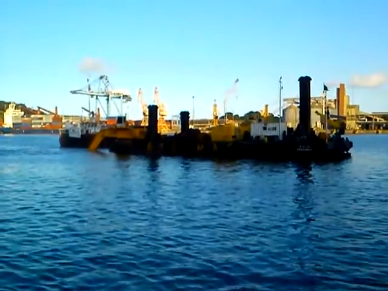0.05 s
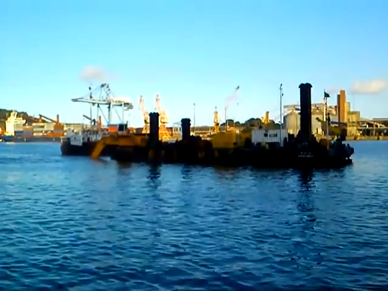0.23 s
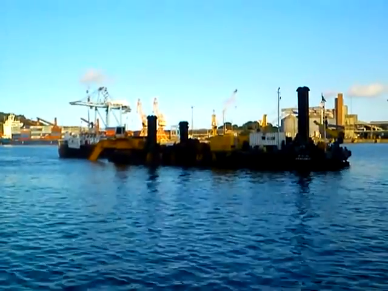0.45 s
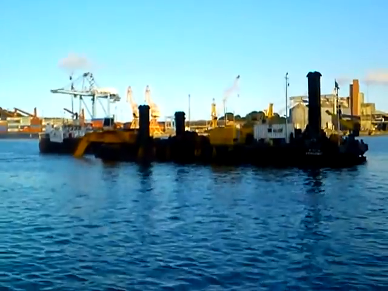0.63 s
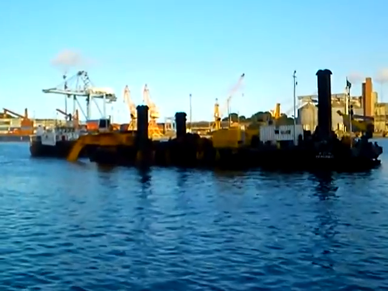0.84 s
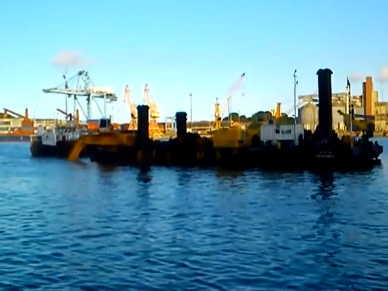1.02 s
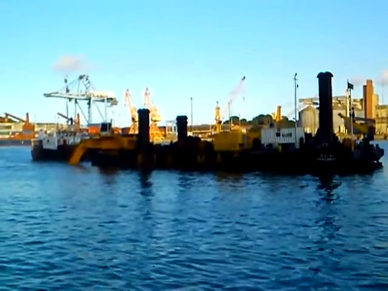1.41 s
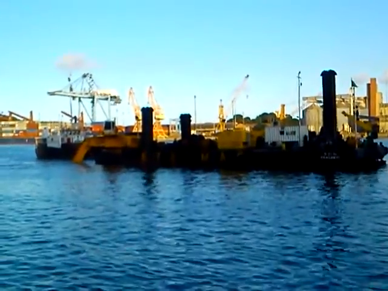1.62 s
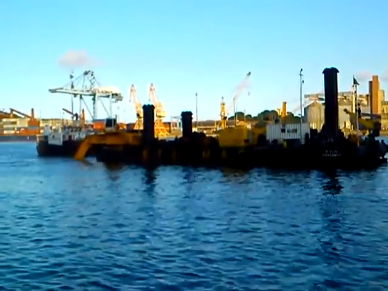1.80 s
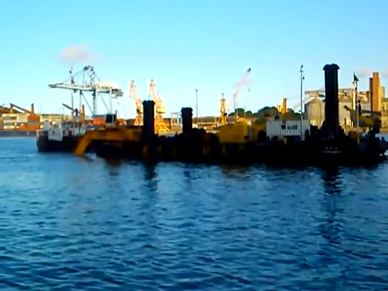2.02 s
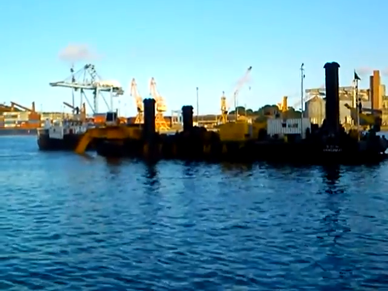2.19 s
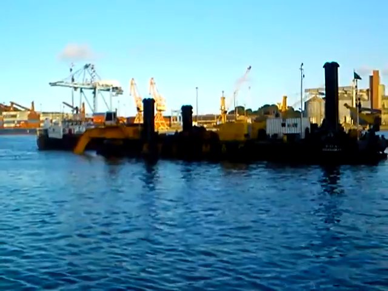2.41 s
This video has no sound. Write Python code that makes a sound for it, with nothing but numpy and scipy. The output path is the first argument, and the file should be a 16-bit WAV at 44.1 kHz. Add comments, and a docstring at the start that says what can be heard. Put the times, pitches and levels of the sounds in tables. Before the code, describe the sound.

High metallic squeals come from a harbour dredger, with engine rumble and water underneath.

```python
"""Dredger squealing across a harbour

Dry steel rubs on steel, sticking and slipping until it locks on to a mode and sings. The main squeal
comes in three strokes, with a high screech and short squeals from other modes around it, while the
sliding surfaces hiss in narrow, gliding bands. Underneath: diesel rumble, water wash, a little wind."""
import sys
import numpy as np
from scipy import signal
from scipy.fft import rfft, irfft
from scipy.io import wavfile
from scipy.ndimage import uniform_filter1d

SR = 44100
rng = np.random.default_rng(int(sys.argv[2]) if len(sys.argv) > 2 else 0)


def bounce(signal):
    """Save signal as a 16-bit WAV file at the path given by the first command-line argument."""
    frames = np.transpose(np.atleast_2d(signal))
    limited = np.clip(frames, -1, 1)
    pcm = np.round(limited * 32767).astype(np.int16)
    wavfile.write(sys.argv[1], SR, pcm)


N = 112454
TIME = np.arange(N) / SR

# main squeal, one curve per stroke: time_s, pitch_hz, harmonic1_db, harmonic2_db, harmonic3_db
STROKES = [
    [(0.27, 2242, -49, -63, -70), (0.31, 2210, -40.5, -62, -70), (0.35, 2232, -35.5, -53, -64),
     (0.412, 2184, -27.5, -41, -48), (0.428, 2195, -44.5, -30.5, -50), (0.45, 2190, -24, -23.5, -45),
     (0.464, 2189, -29.5, -50, -50), (0.486, 2228, -41, -25, -39), (0.499, 2227, -27, -49, -47),
     (0.51, 2238, -42, -29, -37), (0.527, 2225, -18, -32.5, -55), (0.543, 2259, -36, -43, -46),
     (0.552, 2275, -29, -45, -45), (0.57, 2300, -48, -60, -56), (0.595, 2288, -34.5, -51, -65),
     (0.67, 2180, -47.5, -58, -59)],
    [(0.86, 2240, -51, -51, -50), (0.888, 2250, -27.5, -47, -52), (0.903, 2270, -33, -32.5, -41),
     (0.925, 2242, -18, -28, -39), (0.947, 2246, -21.5, -22.5, -35), (0.965, 2246, -21.5, -47, -30.5),
     (0.98, 2237, -21, -26.5, -35), (0.993, 2233, -28, -51, -45), (1.007, 2234, -21, -30, -34),
     (1.018, 2203, -36, -34, -31.5), (1.032, 2233, -12, -25, -39), (1.05, 2280, -20, -42, -30.5),
     (1.075, 2231, -22, -23.5, -37.5), (1.105, 2223, -29.5, -19.5, -22), (1.128, 2226, -16.5, -26, -32),
     (1.16, 2223, -22, -24.5, -29.5), (1.173, 2249, -42, -27, -43), (1.19, 2249, -30.5, -35, -33),
     (1.217, 2253, -20, -33, -43), (1.24, 2244, -64, -51, -32), (1.262, 2255, -33, -53, -62)],
    [(2.11, 2296, -45, -63, -61), (2.132, 2246, -26.5, -60, -57), (2.152, 2240, -25.5, -38, -41.5),
     (2.182, 2231, -20, -35, -45), (2.202, 2246, -24, -33.5, -37), (2.22, 2243, -41.5, -38, -42),
     (2.24, 2238, -29.5, -37, -37), (2.27, 2260, -27, -46, -52), (2.287, 2235, -51, -43, -60)],
]
# harmonics 4 and 5, relative to the third: level_db
UPPER_HARMONICS_DB = [-6, -11]
# sum tones from a lower mode dragged along, relative to the squeal: time_s, level_db
SUM_TONE_LEVEL = [(0.3, -30), (0.8, -25), (0.92, -11.5), (1.03, -30), (1.3, -20), (2.3, -31)]
LOWER_MODE_HZ, SIDE_TONE_DB = 1275, -10.5  # side tones sit under the sum tones
# other modes set ringing, relative to the squeal at its peak: pitch_hz, level_db
STEEL_MODES = [(2740, -31), (2980, -30.5), (5780, -27), (7650, -25), (9900, -34), (10250, -18)]
# colour of the squeal's rasp: frequency_hz, relative_db
RASP_COLOUR = [(4000, 0), (7000, 7), (12000, -5)]
RASP_DB, MODE_WIDTH_HZ = -33, 77  # the rasp rides on the squeal's level
ATTACK_S, RELEASE_S, JITTER, JITTER_PER_S = .045, .018, .002, 70
SLIP_DB, SLIPS_PER_S, FLUTTER_DB, FLUTTER_PER_S = 1.2, 130, 3, 30

# high screech: time_s, pitch_hz, level_db
SCREECH = [(1.525, 6260, -58), (1.559, 6240, -26), (1.589, 6250, -27.5), (1.606, 6320, -45),
           (1.627, 6240, -30), (1.672, 6210, -26.5), (1.71, 6280, -37), (1.753, 6210, -27.5),
           (1.785, 6175, -34), (1.838, 6230, -28.5), (1.959, 6340, -54)]
# its octave, relative to the fundamental: time_s, level_db
SCREECH_OCTAVE = [(1.55, -9), (1.65, -5), (1.75, -24)]
CHATTER_SHARE, CHATTER_WIDTH_HZ = .3, 100
# short squeals: start_s, length_s, first_hz, last_hz, level_db, octave_relative_db
SHORT_SQUEALS = [ (0.198, 0.06, 1327, 1296, -31.5, -16), (0.23, 0.1, 2600, 2576, -40.5, -16.5),
                 (0.299, 0.082, 1297, 1303, -28.5, -15.5), (0.411, 0.042, 1299, 1315, -41, -10),
                 (0.585, 0.051, 7230, 7070, -42.5, -20), (0.657, 0.19, 10350, 10360, -48, -25),
                 (0.751, 0.043, 5260, 5110, -47, -17), (0.858, 0.042, 1312, 1276, -36.5, 3),
                 (1.24, 0.06, 10080, 10075, -32.5, -30), (1.3, 0.62, 2245, 2262, -51.5, -25),
                 (1.313, 0.041, 8740, 8800, -40.5, -44), (1.333, 0.053, 10100, 10160, -31.5, -49),
                 (1.409, 0.015, 5110, 5180, -31.5, -17), (1.453, 0.14, 10210, 10190, -37, -24),
                 (1.522, 0.033, 5150, 5046, -35, -1.5), (1.559, 0.055, 5085, 5070, -30, -18),
                 (1.659, 0.09, 2240, 2235, -41.5, -14), (1.727, 0.21, 1265, 1275, -44.5, -32),
                 (1.857, 0.025, 5130, 5130, -34, -11), (1.887, 0.057, 10200, 10190, -37, -30),
                 (1.971, 0.19, 10090, 10200, -41, -36), (1.999, 0.049, 2256, 2275, -36, -22),
                 (2.326, 0.22, 1270, 1275, -41, -16)]
THIRD_DB = -10  # their third harmonic, relative to the octave

# colour of the broad friction hiss: frequency_hz, relative_db
FRICTION_COLOUR = [(2000, -25), (4000, -5.5), (6500, -10), (9000, -10), (10500, -4), (12000, -4.5),
                   (13500, 1.5), (15500, -4)]
# its envelope: time_s, level_db
FRICTION_LEVEL = [(0, -47), (0.45, -41.5), (0.8, -39), (0.92, -31.5), (1.2, -33.5), (1.5, -38.5),
                  (2.15, -42), (2.35, -42.5)]
WHISTLES_PER_S, WHISTLE_S, MAX_GLIDE_HZ_PER_S = 220, .05, 3500
WHISTLE_LOW_HZ, WHISTLE_HIGH_HZ, PEAK_WHISTLE_SHARE = 10500, 15700, .5
# hissing bands of the sliding steel: start_s, length_s, first_hz, last_hz, width_hz, level_db
HISS_BANDS = [ (0.0, 0.2, 10440, 10330, 300, -45), (0.0, 0.42, 11700, 11800, 500, -44.5),
              (0.372, 0.13, 11150, 11270, 303, -43.5), (0.454, 0.071, 12100, 13200, 600, -42.5),
              (0.516, 0.032, 10600, 10500, 199, -44), (0.565, 0.05, 13400, 13100, 400, -42),
              (0.568, 0.074, 15300, 14200, 500, -40), (0.608, 0.12, 12600, 11920, 330, -33.5),
              (0.686, 0.15, 12080, 12300, 217.4, -41.5), (0.777, 0.47, 13600, 13700, 600, -40.5),
              (0.917, 0.6, 14560, 14950, 1330, -36), (1.311, 0.47, 12430, 12440, 400, -39.5),
              (1.361, 0.2, 13120, 13500, 217.4, -34.5), (1.592, 0.22, 13300, 13270, 170, -32),
              (1.55, 0.4, 14900, 14600, 900, -46), (1.858, 0.25, 14660, 13900, 603, -34.5),
              (2.229, 0.37, 12800, 12950, 139, -45.5)]
BAND_WHISTLE_SHARE, BAND_FADE_SHARE, WANDER_PER_S = .35, .2, 5
# colour of the closing hiss: frequency_hz, relative_db
SWELL_COLOUR = [(2500, -0.74), (4500, -1), (8000, -2)]

# colour of the diesel's rumble: frequency_hz, relative_db
RUMBLE_COLOUR = [(25, -31), (45, 5.5), (75, 7.5), (115, -1), (180, 2.5), (260, -15), (400, -25.5),
                 (800, -12.5)]
# its hum: pitch_hz, level_db
ENGINE_TONES = [(103, -47.5), (117, -42), (234, -50)]
RUMBLE_DB, ENGINE_WAVER_DB, ENGINE_PITCH_WAVER = -40.5, .5, .0131
# colour of water and distant machinery: frequency_hz, relative_db
WASH_COLOUR = [(150, 4), (300, 0), (500, -5.5), (850, -3.5), (1200, -7.5), (1500, -1), (1900, -11),
               (2700, -11), (3400, -18), (6000, -28)]
# its envelope: time_s, level_db
WASH_LEVEL = [(0, -37), (0.7, -36), (0.8, -32.5), (0.93, -32.5), (1.35, -36), (1.9, -35.5), (2.2, -38)]
# colour of the wind: frequency_hz, relative_db
WIND_COLOUR = [(18, -2), (40, 14.5), (70, -3), (150, -7), (400, -22)]
# its envelope: time_s, level_db
WIND_LEVEL = [(0, -60), (0.75, -52), (0.951, -35.5), (1.1, -47.5), (2.55, -45)]
HARBOUR_T60_S, HARBOUR_DB, HARBOUR_BUILD_S = .32, -13, .03
CUTOFF_HZ = 15750


def main_squeal():
    """Stick and slip lock on to one mode and drag a lower one; hard rubbing rasps and rings others."""
    out, strength = np.zeros(N), np.zeros(N)
    for stroke in STROKES:
        hz, first_db, second_db, third_db = uniform_filter1d(in_time(stroke), size=200, axis=1)
        phase = jittered_phase(uniform_filter1d(hz, size=1800))
        gains = from_db([first_db, second_db, third_db] + [third_db + db for db in UPPER_HARMONICS_DB])
        tone = sum(gain * slips(k) * np.sin(k * phase) for k, gain in enumerate(gains, 1))
        lower_phase = jittered_phase(np.full(N, LOWER_MODE_HZ))
        sum_tones = np.zeros(N)
        for k, gain in enumerate(gains, 1):
            side_tone = from_db(SIDE_TONE_DB) * np.sin(k * phase + 2 * lower_phase)
            sum_tones += gain * slips(k) * (np.sin(k * phase + lower_phase) + side_tone)
        span = gate(stroke[0][0], stroke[-1][0] - stroke[0][0])
        strength += span * uniform_filter1d(from_db(np.maximum(first_db, second_db)), size=1000)
        out += span * np.sqrt(2) * (tone + envelope(SUM_TONE_LEVEL) * sum_tones)
    ringing = sum(from_db(db) * shaken(2 * np.pi * hz * TIME, MODE_WIDTH_HZ) for hz, db in STEEL_MODES)
    rasp = from_db(RASP_DB) * slips(3) * noise(RASP_COLOUR)
    return out + strength * (rasp + strength / strength.max() * ringing)


def screech():
    """A high mode grips in short bursts and chatters."""
    hz, db = in_time(SCREECH)
    phase = jittered_phase(uniform_filter1d(hz, size=1800))
    fundamental, octave = [
        blend(shaken(k * phase, CHATTER_WIDTH_HZ), np.sqrt(2) * np.sin(k * phase), CHATTER_SHARE)
        for k in (1, 2)]
    span = gate(SCREECH[0][0], SCREECH[-1][0] - SCREECH[0][0])
    return span * from_db(db) * (fundamental + envelope(SCREECH_OCTAVE) * octave)


def short_squeals():
    """Other modes catch for a moment, swelling in and gliding a little."""
    out = np.zeros(N)
    for start, length, first_hz, last_hz, level_db, octave_db in SHORT_SQUEALS:
        phase = jittered_phase(np.interp(TIME, [start, start + length], [first_hz, last_hz]))
        level = from_db(level_db) * flutter() * slips(1.8) * gate(start, length)
        partials = enumerate([0, octave_db, octave_db + THIRD_DB], 1)
        tone = sum(from_db(db) * np.sin(k * phase) for k, db in partials if k * first_hz < CUTOFF_HZ)
        out += np.sqrt(2) * level * tone
    return out


def friction_hiss():
    """Broad hiss of sliding steel: the harder it rubs, the more it whistles."""
    level = envelope(FRICTION_LEVEL)
    whistle_share = PEAK_WHISTLE_SHARE * level / level.max()
    return level * flutter() * blend(whistles(), noise(FRICTION_COLOUR), whistle_share)


def whistles():
    """A swarm of brief gliding whistles in the friction's colour; rms 1."""
    out, t = np.zeros(N + SR), np.arange(int(WHISTLE_S * SR)) / SR
    count = int(WHISTLES_PER_S * N / SR)
    for k, (when, pitch, glide, strength) in enumerate(rng.random((count, 4))):
        hz = WHISTLE_LOW_HZ + pitch * (WHISTLE_HIGH_HZ - WHISTLE_LOW_HZ)
        start = int((k + when) * N / count)
        gain = strength ** 2 * from_db(np.interp(hz, *np.transpose(FRICTION_COLOUR)))
        phase = phase_of(hz + (2 * glide - 1) * MAX_GLIDE_HZ_PER_S * t)
        out[start:start + len(t)] += gain * np.hanning(len(t)) * np.sin(phase)
    return rms_one(out[:N])


def hiss_bands():
    """Friction shakes high, gliding resonances that half lock into wandering whistles."""
    out = np.zeros(N)
    for start, length, first_hz, last_hz, width_hz, db in HISS_BANDS:
        hz = np.interp(TIME, [start, start + length], [first_hz, last_hz])
        whistle = sum(drift(FLUTTER_PER_S) * np.sin(phase_of(hz + width_hz / 2 * drift(WANDER_PER_S)))
                      for _ in range(2))
        band = blend(whistle, shaken(phase_of(hz), width_hz), BAND_WHISTLE_SHARE)
        fade_s = BAND_FADE_SHARE * length
        out += from_db(db) * gate(start, length, fade_s, fade_s) * band
    return out


def closing_hiss():
    """A soft hiss swells in near the end."""
    return from_db(-41.5) * gate(start_s=2.46, length_s=N / SR, attack_s=.091) * noise(SWELL_COLOUR)


def harbour_reflections(sound):
    """Hull, water and quays scatter the sound into a short tail."""
    build_up = np.minimum(TIME / HARBOUR_BUILD_S, 1)
    tail = rng.standard_normal(N) * from_db(-60 * TIME / HARBOUR_T60_S) * build_up
    return from_db(HARBOUR_DB) * signal.fftconvolve(sound, tail / np.sqrt(np.sum(tail ** 2)))[:N]


def diesel():
    """The engine hums in low, wavering tones over a bed of rumble."""
    hum = np.zeros(N)
    for hz, db in ENGINE_TONES:
        level = from_db(db + ENGINE_WAVER_DB * drift(per_s=4.9))
        hum += level * np.sin(phase_of(hz * (1 + ENGINE_PITCH_WAVER * drift(per_s=5.24))))
    return hum + from_db(RUMBLE_DB) * noise(RUMBLE_COLOUR)


def water_wash():
    """Water and distant machinery blur into one gently swelling bed."""
    return envelope(WASH_LEVEL) * noise(WASH_COLOUR)


def wind():
    """Wind buffets the microphone with one low gust."""
    return envelope(WIND_LEVEL) * noise(WIND_COLOUR)


def slips(harmonic):
    """Uneven slips roughen the level, more so in higher harmonics."""
    return from_db(SLIP_DB * harmonic ** .75 * np.tanh(drift(SLIPS_PER_S)))


def flutter():
    """A smooth, random tremolo within FLUTTER_DB either way."""
    return from_db(FLUTTER_DB * np.tanh(uniform_filter1d(drift(FLUTTER_PER_S), size=400)))


def shaken(phase, width_hz):
    """A resonance shaken at random; rms 1."""
    return drift(width_hz / 2) * np.cos(phase) + drift(width_hz / 2) * np.sin(phase)


def jittered_phase(hz):
    """Phase of a slightly unsteady pitch."""
    return phase_of(hz * (1 + JITTER * drift(JITTER_PER_S)))


def phase_of(hz):
    """Phase of a moving pitch."""
    return 2 * np.pi * np.cumsum(hz) / SR


def drift(per_s):
    """Smooth random modulation at about this rate; rms 1."""
    pole = np.exp(-16 * np.pi * per_s / SR)  # runs at SR / 8
    slow = signal.lfilter([1], [1, -2 * pole, pole * pole], rng.standard_normal(N // 8 + 3002))[3000:]
    return np.interp(np.arange(N) / 8, np.arange(len(slow)), rms_one(slow))


def noise(colour):
    """Coloured noise, rolling off beyond the curve's ends; rms 1."""
    hz, db = np.transpose(colour)
    bin_hz = np.maximum(np.arange(N // 2 + 1) * SR / N, 1)
    skirts = 1 / (1 + (bin_hz / hz[-1] / 2) ** 4) / (1 + (hz[0] / bin_hz / 2) ** 4)
    shape = from_db(np.interp(np.log(bin_hz), np.log(hz), db))
    return rms_one(irfft(rfft(rng.standard_normal(N)) * skirts * shape, N))


def gate(start_s, length_s, attack_s=ATTACK_S, release_s=RELEASE_S):
    """Fade-in centred on the start, hold and exponential release."""
    rise = np.clip((TIME - start_s) / attack_s + .5, 0, 1)
    return np.sin(rise * np.pi / 2) ** 2 * np.exp(-np.maximum(TIME - start_s - length_s, 0) / release_s)


def envelope(curve):
    """A level curve as a gain at every sample."""
    return from_db(in_time(curve)[0])


def in_time(curve):
    """Each value column of a curve at every sample."""
    time_s, *columns = np.transpose(curve)
    return [np.interp(TIME, time_s, column) for column in columns]


def blend(one, other, share):
    """Equal-power mix; the first sound gets this share."""
    return np.sqrt(share) * one + np.sqrt(1 - share) * other


def from_db(db):
    """Decibels to gain."""
    return 10 ** (np.asarray(db) / 20)


def rms_one(x):
    """Scale to unit power."""
    return x / np.sqrt(np.mean(x ** 2) + 1e-20)


def scene():
    """The steel and its reflections over engine, water and wind, in mono."""
    steel = main_squeal() + screech() + short_squeals() + friction_hiss() + hiss_bands() + closing_hiss()
    return (steel + harbour_reflections(steel) + diesel() + water_wash() + wind())[None]


def record(dry):
    """A steep low-pass trims the very top."""
    return signal.sosfilt(signal.ellip(12, .1, 90, CUTOFF_HZ, fs=SR, output="sos"), dry)


dry = scene()
out = record(dry)
bounce(out)
```